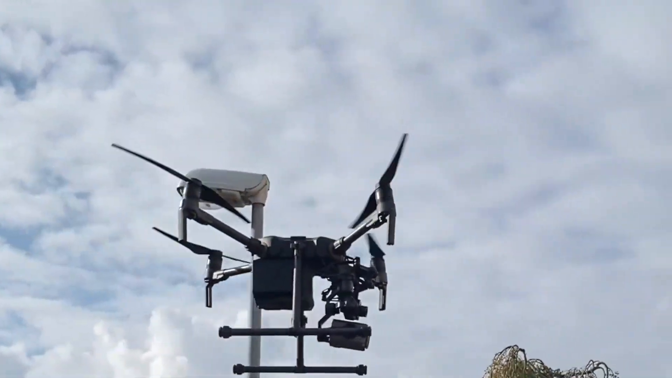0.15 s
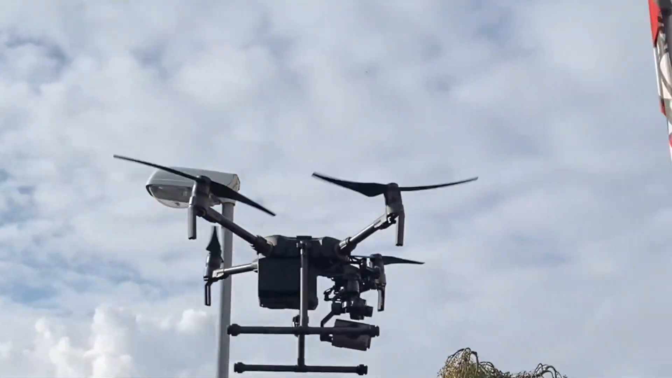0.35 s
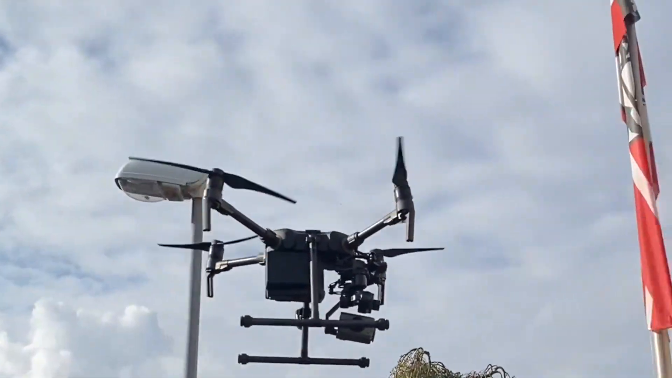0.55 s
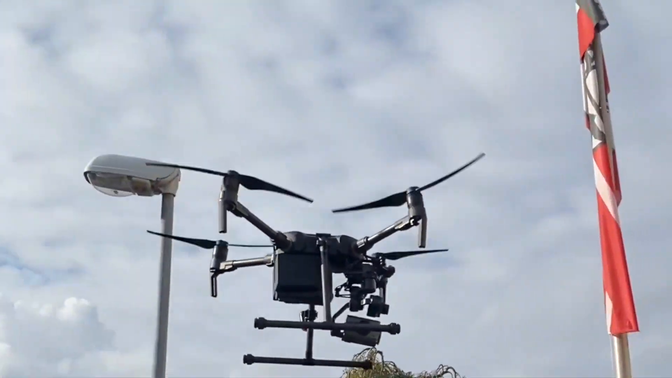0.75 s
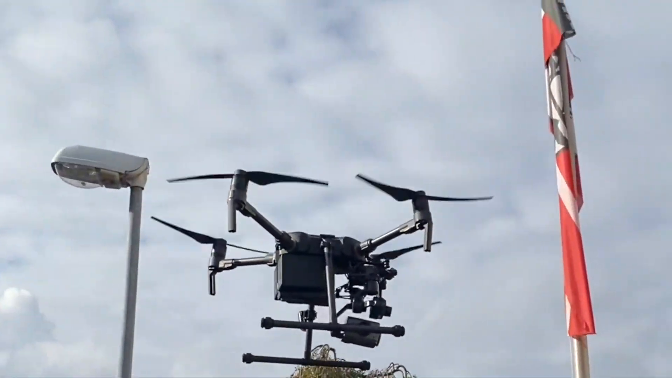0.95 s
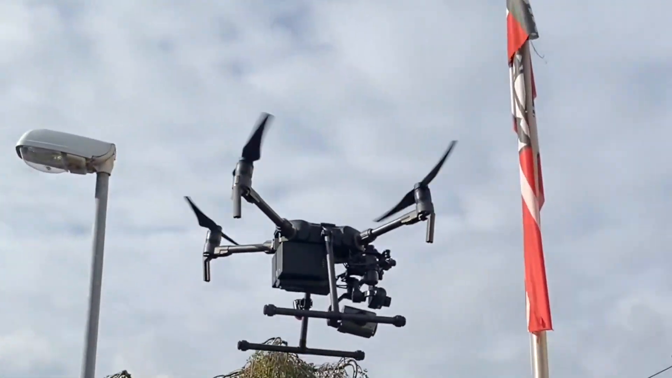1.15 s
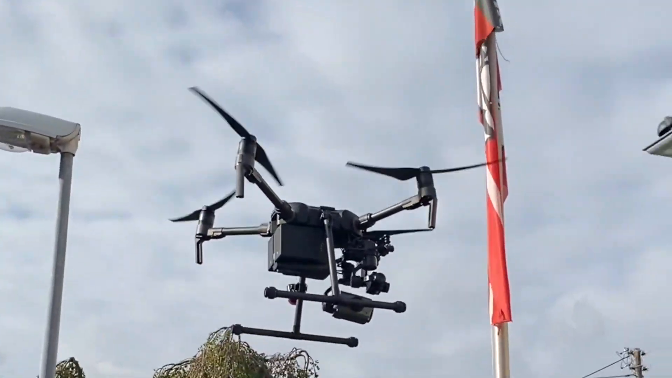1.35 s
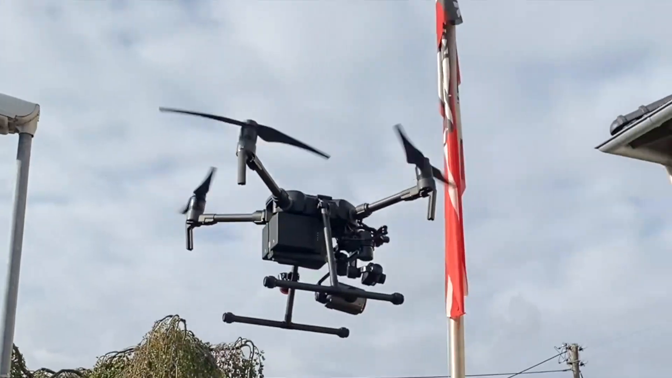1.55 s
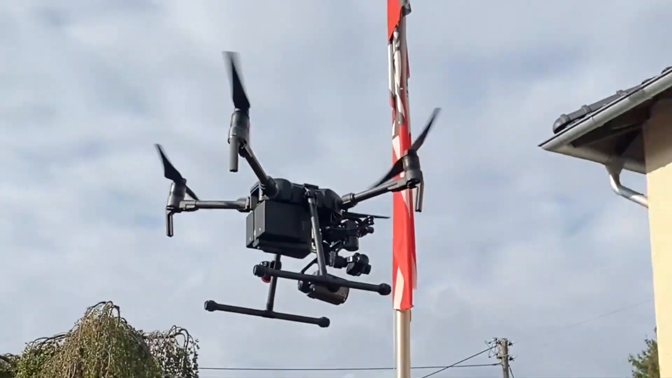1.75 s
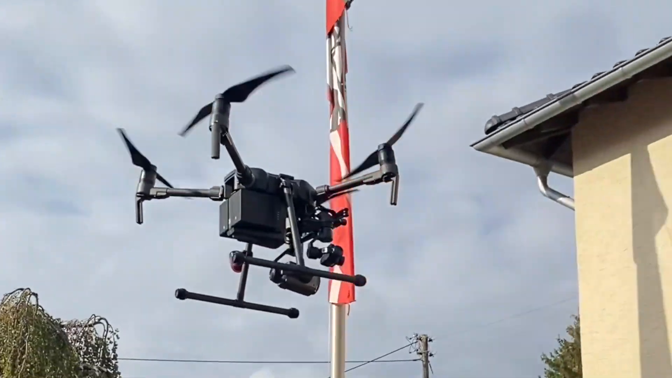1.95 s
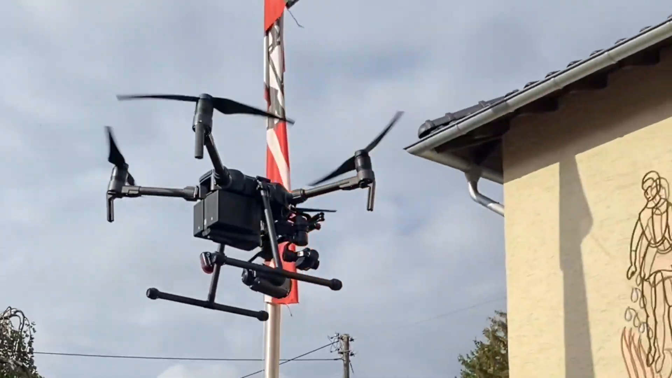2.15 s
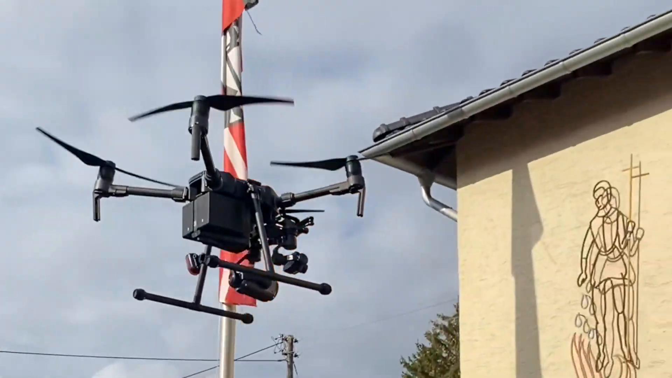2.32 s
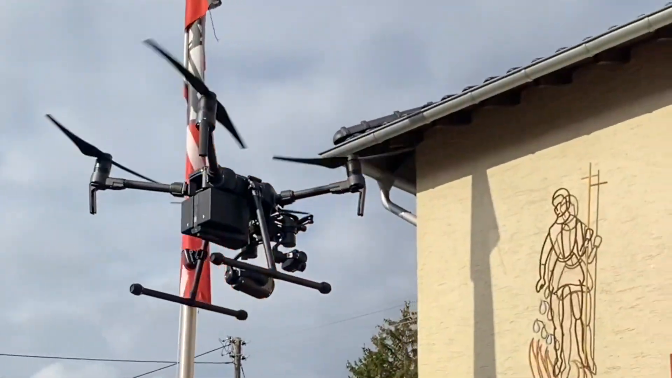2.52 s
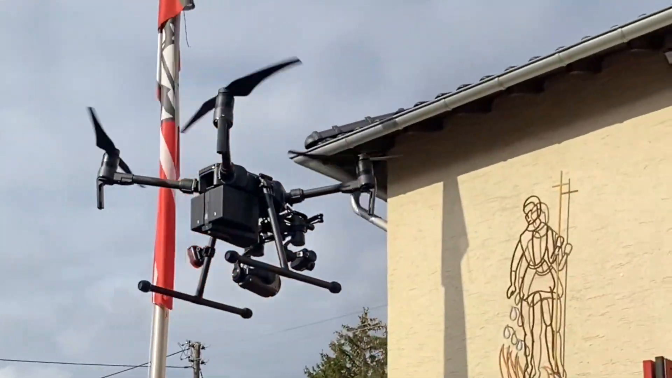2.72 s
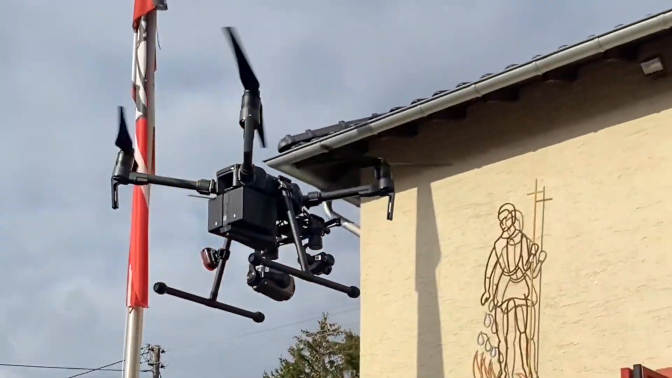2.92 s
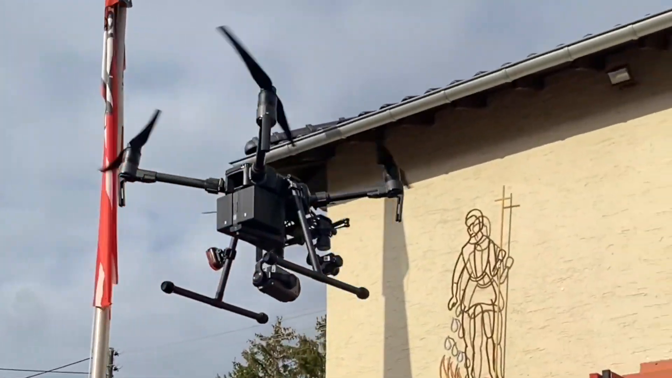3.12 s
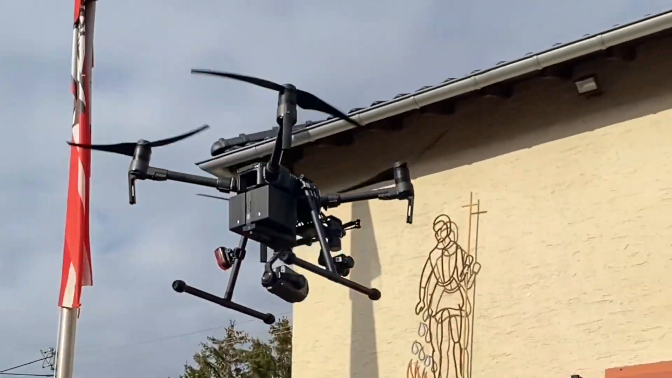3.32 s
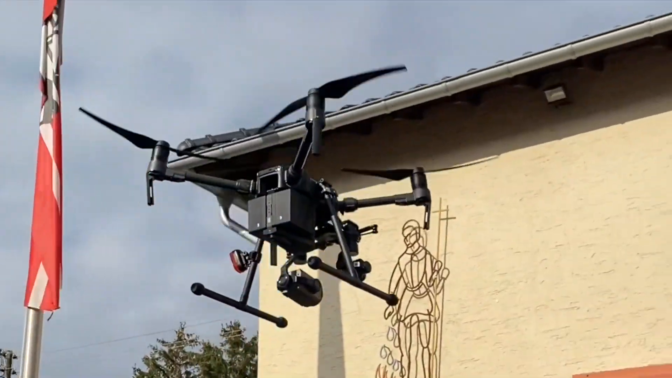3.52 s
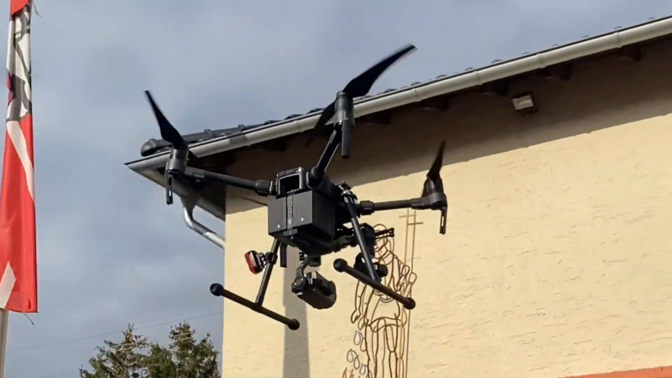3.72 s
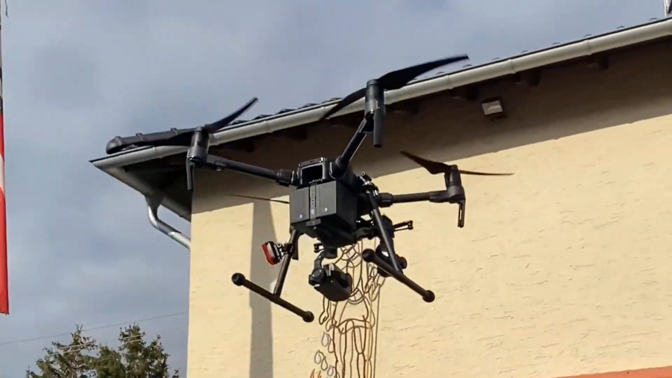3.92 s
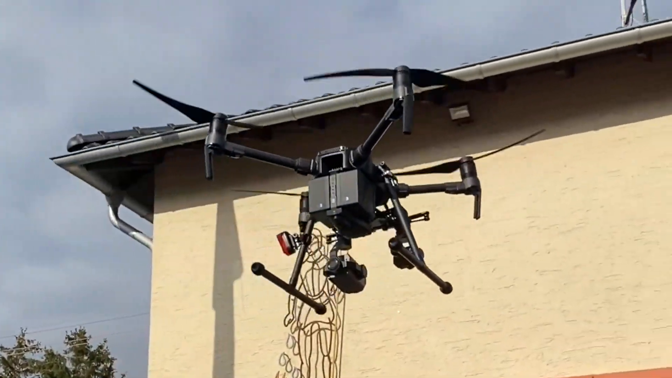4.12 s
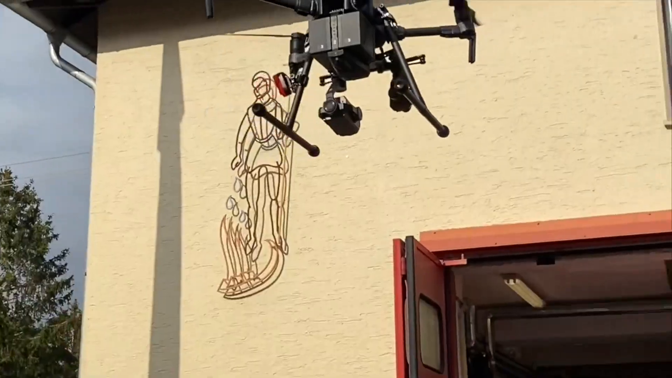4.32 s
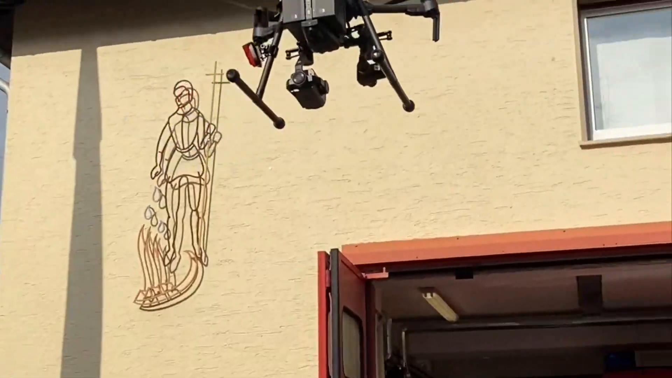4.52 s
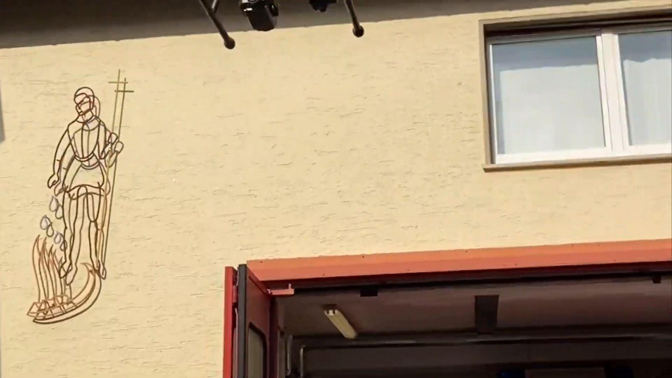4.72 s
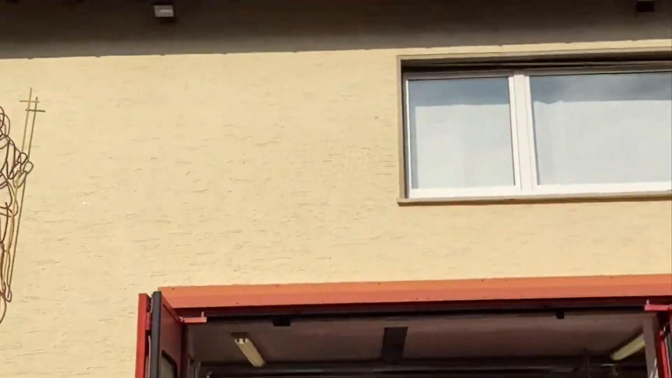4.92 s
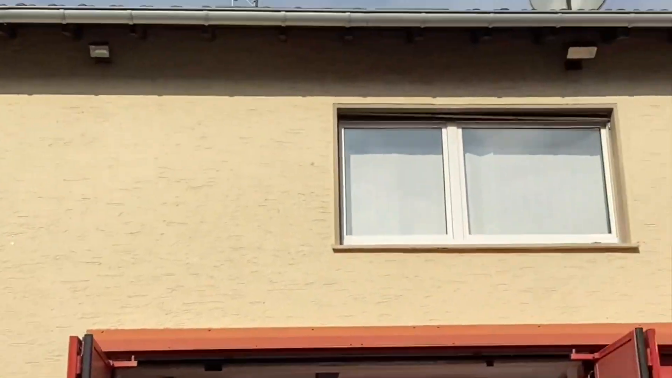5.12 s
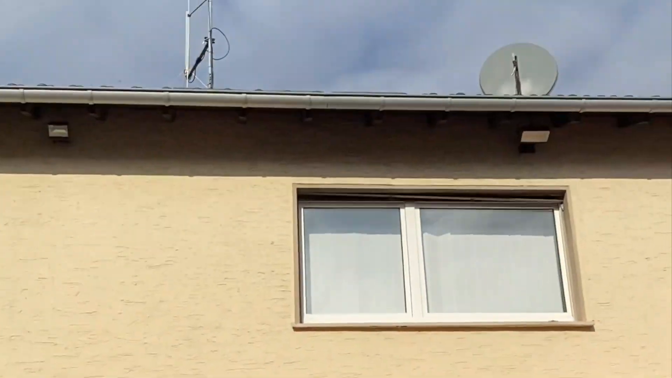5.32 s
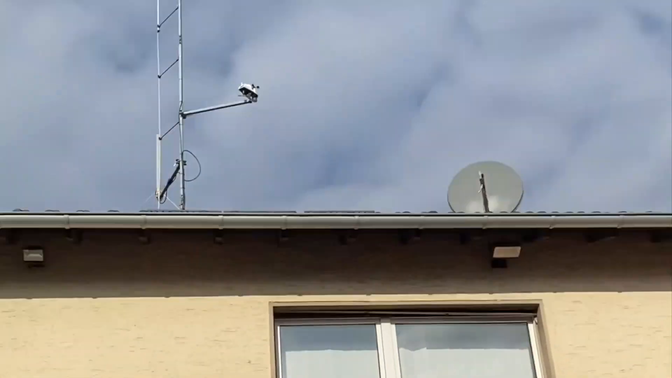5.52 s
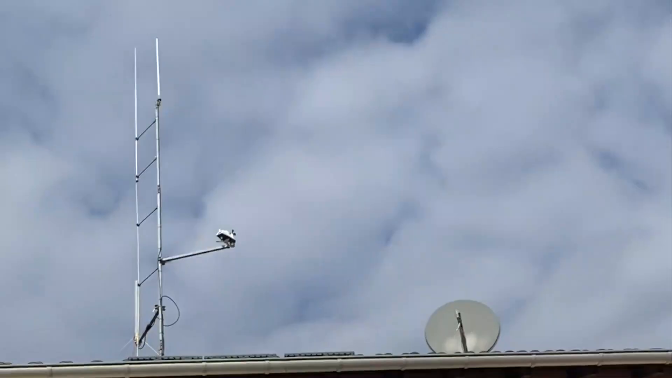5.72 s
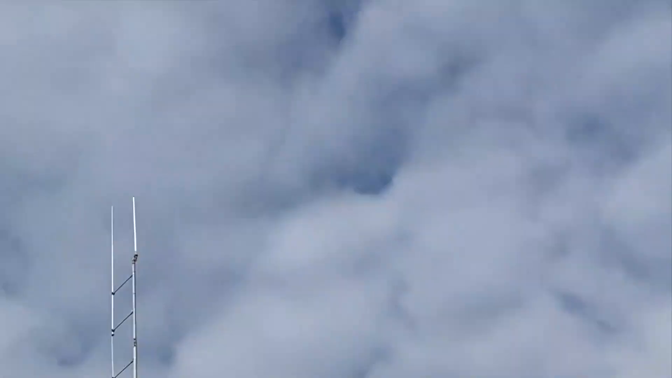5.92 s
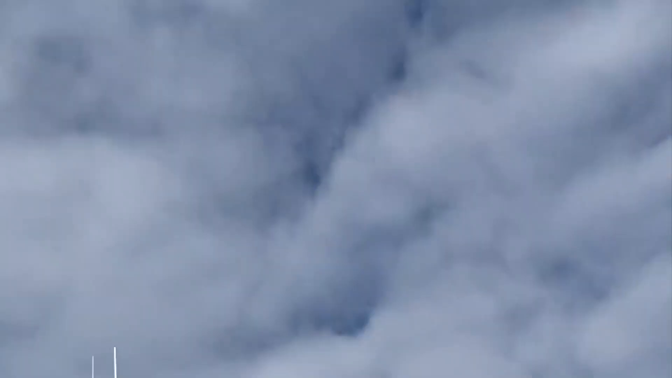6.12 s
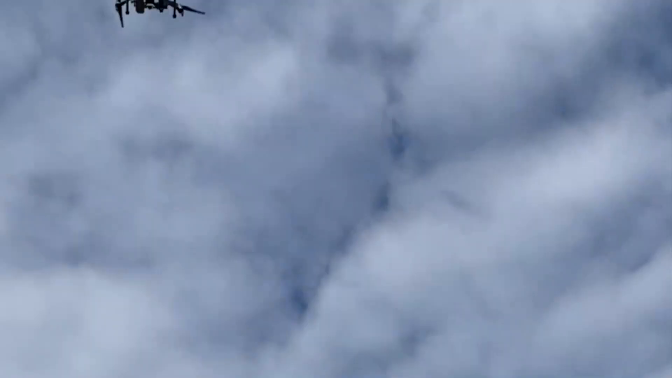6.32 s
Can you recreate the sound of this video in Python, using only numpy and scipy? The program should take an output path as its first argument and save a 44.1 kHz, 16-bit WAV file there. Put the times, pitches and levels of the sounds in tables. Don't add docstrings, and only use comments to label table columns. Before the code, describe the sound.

Outdoors near a building, a large four-rotor drone hovers close to a hand-held stereo microphone: a low, beating hum under a bright raspy buzz and chopped air hiss. After about four seconds it dips for an instant, surges higher and louder, then suddenly dulls behind the roof and recedes. Wind thumps and faint grip knocks accompany it.

```python
import sys
import numpy as np
from scipy import signal
from scipy.io import wavfile
from scipy.ndimage import uniform_filter1d

SR = 44100
rng = np.random.default_rng(int(sys.argv[2]) if len(sys.argv) > 2 else 0)


def nominal_scale(level):
    x = np.asarray(level, float) / 20
    return 10 ** x


def unload_wav(signal):
    wavfile.write(
        sys.argv[1],
        SR,
        np.round(np.clip(np.atleast_2d(signal).T, -1, 1) * 32767).astype(np.int16),
    )


N = 280476
T = np.arange(N) / SR
TREBLE_HZ = 5600

# pitch_hz, level_db
AIR_COLOUR = [(60, -23), (300, -15.5), (800, -5), (1200, -17), (1600, -35), (2150, -13), (3200, -17),
              (5000, -12.5), (8500, -21.5), (15800, -17.5)]
# centre_s, level_db, half_length_s
GUSTS = [(.08, -63, .04), (.22, -56, .03), (.5, -58, .05), (1.45, -63, .06), (6.207, -52, 0.025),
         (5.27, -46, 0.028), (1.75, -53, .08), (.9, -52, .08), (6.31, -51, .025), (0.778, -48, .03),
         (0.922, -42, 0.03), (2.322, -42, 0.056), (2.551, -50.5, .04), (2.672, -37, 0.042),
         (2.803, -44, 0.036), (3.187, -38, 0.05), (3.338, -24.5, 0.051), (3.63, -46, 0.056),
         (3.989, -43, 0.06), (4.423, -41, 0.063), (4.645, -35.5, 0.043), (4.996, -35.5, 0.045),
         (5.067, -43, 0.023), (5.184, -44, 0.028), (5.347, -38, 0.029), (5.65, -67, .03),
         (5.848, -22.5, 0.019), (5.93, -35.5, 0.018), (6.253, -36.5, 0.027)]
# pitch_hz, level_db
GUST_COLOUR = [(22, -52), (32, -26), (42, -8), (65, 4), (110, -2.5), (200, -14), (400, -62), (800, -57)]
# centre_s, level_db, ring_hz, half_length_s
KNOCKS = [
    (.8, -46, 335, .03),
    (0.974, -32, 603, 0.013),
    (1.041, -33, 754, .012),
    (1.084, -39, 595, 0.034),
    (1.978, -48, 331, 0.029),
    (3.59, -36, 610, .03),
]
# pitch_hz, likeness_0_to_1, left_minus_right_db
MICROPHONES = [(169, 1, -1), (330, 1, 0.5), (513, 0.8, 1), (1070, 0.76, 7.5), (1440, 0.68, 3.5),
               (1900, 1, -1.5), (2080, 0.58, -3.5), (2520, 0.56, -4.5), (3730, 0.25, -12), (3930, 0.63, -7),
               (5730, 1, 2.5), (7240, 0.7, -6)]
# pitch_hz, lead_radians
LEFT_LEAD = [(170, 0), (860, .35), (1400, -.7), (2050, -.4), (2420, .8), (3300, -.6), (4700, .85),
             (5600, .9), (7500, 3.14), (10400, 6.28), (12550, 8.65), (14700, 10.2), (15300, 11.7),
             (15900, 12.4)]
# time_s, pitch_hz, depth_db
ECHO_DIP = [(4.7, 2900, 0.8), (4.95, 3050, -4.5), (5.15, 3000, -8), (5.28, 3020, -8), (5.4, 2950, -6),
            (5.52, 2830, -11), (5.8, 3100, -5), (6.1, 3500, -5), (6.2, 4300, -9), (6.36, 3700, -7)]
# time_s, pitch_hz, lift_db
ECHO_GLOW = [(0, 3150, 5), (.15, 3300, 0.5), (.25, 3800, 2), (.45, 4400, 1.5), (.9, 4500, 1),
             (1.2, 4000, -2.3), (2.4, 3000, 3.3), (2.7, 3020, 1.5), (3.0, 3000, 1.3), (4.1, 2300, -1.5),
             (4.35, 2200, 2.2), (4.6, 3000, 0.5), (4.8, 4040, 1.5), (4.95, 4000, 6), (5.15, 3600, 7.5),
             (5.28, 3600, 8.5), (5.36, 3600, 2), (6.36, 3600, -5)]
# time_s, level_db, treble_tilt_db
HISS = [(0.0, -40, 6.5), (0.03, -29, 1), (0.21, -32, 0.5), (0.65, -29.5, 0), (1.2, -30, 0.5),
        (2.46, -29, 0.5), (2.87, -31, 0), (4.18, -30, 0), (4.39, -24.5, 0.5), (4.6, -23, 0),
        (5.1, -31.5, 0.5), (5.26, -32.5, -0.5), (5.33, -45.5, 2.5), (5.56, -48, 3.5), (6.36, -50, 2.5)]
# pitch_hz, level_db
HISS_COLOUR = [(100, -12), (250, -5.5), (500, -4.5), (1000, 1.5), (2000, 2), (3000, 3.5), (3800, -2),
               (4500, 1), (6000, -3.5), (8000, -2), (10500, -7), (13000, -6), (15900, -14.5)]
# time_s, level_db
HISS_THINNING = [
    (0, -4),
    (4.2, -4),
    (4.4, -5),
    (4.9, -7),
    (5.25, -8),
    (5.4, 0),
]
# time_s, speed_share_of_hover
THROTTLE = [(4.19, 1.0), (4.25, 1.071), (4.33, 1.154), (4.42, 1.172), (4.63, 1.209), (4.85, 1.226),
            (5.07, 1.244), (5.18, 1.241), (5.29, 1.22), (5.4, 1.184), (5.66, 1.124), (5.82, 1.094),
            (6.36, 1.068)]
# time_s, then rotor_1_hz to rotor_4_hz
TRIM = [(0.0, 124.9, 131.4, 140.2, 142.8), (0.15, 125.3, 131.5, 140.8, 142.5),
        (0.3, 125.1, 131.0, 141.2, 141.7), (0.45, 125.0, 130.8, 140.4, 141.3),
        (0.6, 124.9, 130.3, 139.7, 141.5), (0.75, 125.1, 130.5, 140.3, 141.1),
        (0.9, 126.2, 130.8, 140.8, 141.4), (1.05, 126.9, 131.0, 142.5, 141.9),
        (1.2, 126.2, 131.3, 142.5, 141.9), (1.35, 125.6, 130.6, 142.2, 141.6),
        (1.5, 127.1, 128.5, 141.5, 140.9), (1.65, 128.0, 128.4, 141.3, 140.9),
        (1.8, 128.4, 129.2, 141.2, 139.6), (1.95, 128.5, 128.9, 142.0, 139.0),
        (2.1, 127.6, 129.5, 143.6, 139.6), (2.25, 126.4, 129.9, 144.1, 139.5),
        (2.4, 127.7, 130.4, 143.9, 140.0), (2.55, 128.3, 130.4, 142.9, 139.8),
        (2.7, 127.6, 130.6, 142.4, 140.4), (2.85, 125.7, 130.3, 141.3, 140.5),
        (3.0, 125.1, 130.5, 141.6, 141.0), (3.15, 126.0, 130.5, 142.3, 141.1),
        (3.3, 126.5, 131.0, 143.0, 141.1), (3.45, 126.7, 130.9, 142.7, 141.4),
        (3.6, 125.4, 131.1, 141.5, 141.9), (3.75, 124.5, 131.8, 141.2, 143.1),
        (3.9, 124.3, 131.8, 140.9, 143.9), (4.05, 123.5, 131.6, 140.2, 142.8),
        (4.2, 124.2, 131.8, 140.1, 142.8), (4.35, 124.5, 131.7, 140.2, 142.3),
        (4.5, 125.1, 131.4, 140.4, 142.2), (4.65, 125.0, 130.9, 140.3, 141.9),
        (4.8, 125.7, 130.3, 140.0, 141.8), (4.95, 126.1, 130.3, 139.8, 140.8),
        (5.1, 126.1, 130.8, 140.2, 140.7), (5.25, 127.3, 131.2, 140.9, 140.1),
        (5.4, 127.2, 132.9, 140.8, 140.2), (5.7, 125.0, 132.3, 141.1, 140.4),
        (6.0, 124.0, 131.9, 140.1, 139.4), (6.36, 124.1, 131.3, 139.8, 139.1)]
HUM_START = [.1, .3, .6, .8]
# time_s, then rotor_1_db to rotor_4_db
LIFT = [(0.0, -51, -30, -30, -26), (0.25, -42, -34.5, -37, -36), (0.45, -50, -35, -44, -34),
        (0.75, -60, -35, -47, -26), (1.1, -39, -34, -36, -29.5), (1.5, -39, -69, -38, -28.5),
        (1.75, -36, -41, -37, -28.5), (2.0, -37, -50, -29, -35), (2.35, -36.5, -51, -31.5, -37),
        (2.7, -34, -48, -31, -41), (2.85, -33.5, -43, -34, -37), (3.0, -35, -36, -43, -36.5),
        (3.25, -31, -45, -34, -33.5), (3.6, -34.5, -35, -29.5, -37), (4.0, -31, -33, -38, -33),
        (4.19, -39, -45, -38, -32), (4.3, -27.5, -39, -27, -29), (4.6, -30, -29.5, -30, -36),
        (5.0, -69, -36, -50, -27), (5.2, -42, -32.5, -31, -44), (5.4, -27, -29, -27.5, -68),
        (5.62, -32, -31, -31, -69), (5.8, -37, -32, -24, -69), (6.0, -42, -35, -33, -56),
        (6.36, -47, -46, -33, -64)]
# time_s, then rotor_1_db to rotor_4_db
SLAP = [(0.0, -27, -39, -44, -32.5), (0.1, -42, -37, -36, -28), (0.2, -42, -38, -36, -32.5),
        (0.3, -38, -38.5, -35, -33), (0.4, -31, -37, -30, -35), (0.52, -31, -37, -43, -31.5),
        (0.6, -37.5, -44, -44, -31.5), (0.7, -34, -41, -39, -30.5), (0.8, -30.5, -42, -28.5, -32.5),
        (1.0, -34.5, -32.5, -28.5, -33), (1.2, -30, -58, -29, -37.5), (1.4, -35.5, -32.5, -51, -31.5),
        (1.6, -29.5, -44, -47.5, -28), (1.8, -32.5, -31, -35, -29.5), (2.0, -31, -42, -41, -28.5),
        (2.2, -29, -42, -52, -30.5), (2.4, -32.5, -47, -38, -29.5), (2.6, -30.5, -63, -32.5, -30.5),
        (2.8, -30, -37, -35.5, -31), (3.0, -27.5, -32, -29, -34), (3.2, -27.5, -35, -32, -40.5),
        (3.4, -34, -37, -36, -30), (3.6, -30.5, -33, -33, -32), (3.8, -30, -41, -33, -33.5),
        (4.0, -31, -37, -38, -34), (4.19, -32.5, -30.5, -41, -30.5), (4.3, -33.5, -31, -27.5, -30),
        (4.4, -29.5, -27.5, -24.5, -39), (4.5, -25.5, -31, -34, -39), (4.6, -23, -28, -20, -37),
        (4.7, -27.5, -28, -23.5, -40), (4.8, -29.5, -29, -28, -31.5), (4.9, -29, -31, -34, -36),
        (5.0, -40, -45, -31.5, -33), (5.1, -35.5, -31.5, -32, -36.5), (5.2, -73, -32, -30, -34),
        (5.3, -65, -35, -28, -39), (5.4, -70, -38.0, -35, -44), (5.85, -60, -35, -37, -32),
        (6.36, -60, -31, -30, -44)]
THROB_DB = [-38, -37.5, -42, -31.5]
DRONE_DB = [-39, -38, -37, -33.5]
SHADE_DB = [-16, -13.5, -15.5, -26.5]
BEHIND_DB = [1, -1, -1, 1.5]
# multiple_of_blade_passes, level_db
STACK = [(2, -5.5), (3, -2.5), (4, -7), (7, -10), (8, -11), (12, -11.5), (20, -13.5), (30, -15),
         (40, -20.5), (50, -26.5), (64, -28.5), (90, -40)]
# pitch_hz, smear_radians
SMEAR = [(1500, 1.3), (3000, .45)]
# time_s, even_multiples_db, over_25_db, near_16_db
VIEW = [(0, -2, 3.5, 1.5), (.12, -1.5, 2, 2), (.25, -3, -3.5, 2.5), (.45, -4, 3.5, -3.5), (.6, -2, 8, 0),
        (.85, -2.5, 3, -5.5), (1.1, -0.5, 1, -3.5), (1.3, 0, 6, 1.5), (1.5, -0.5, 4, 0),
        (1.75, 0, 1.5, 0.5), (2.0, 0, 3, 3), (2.25, 0, 2.3, 2), (2.5, 1, 3, 2.5), (2.75, 0, -0.5, 2),
        (3.0, 1.5, -2, -6), (3.3, 2, 0.5, 0.5), (3.6, 1, -2.5, -3), (3.9, 1, -0.5, -0.5),
        (4.15, 2, -1.5, -3), (4.3, 6.5, -1.5, -3.5), (4.5, 3.5, 1, 1.5), (4.65, 3.5, -0.5, -3.5),
        (4.8, 2, 3, 4), (5.0, -0.5, 5, 8.5), (5.15, 3, 3, 7.5), (5.5, 1.5, 7.5, -1), (5.9, 4, 10, 8),
        (6.36, 4.5, -9, 1)]
FROM_FRONT = [(1.5, -1, -13, -4.5, 1.5, 8.2), (1.5, -12.5, 0, -15, 4, 3.5), (1.5, -13, 5.5, 1, 2, 2.1),
              (2.5, -0.5, 0.5, 2.5, 0.5, 4.5)]
SIDE_ON = [(1.5, 2.6, -11, 2.5, 4.5, 6.4), (1.5, -7, 3.5, 2.5, -2, .4), (1.5, 2.2, 6, -1.5, -5, 0.97),
           (1.5, 0.3, -3.5, 1.5, -4, 2.4)]
BY_WALL = [(1.5, 1.7, -10, 6, -3, 4.8), (1.5, -6, 1, -2, 4, .4), (1.5, 0, -1.5, -2, -9, 1.1),
           (1.5, 3.1, -3.5, 2, -10, 3.1)]
TILTED = [(1.3, 8, 3, 0.2, 5, 3), (1.5, 5, 2.5, 0.2, -4, .4), (1.5, -1, -3, -1.5, -7, -3),
          (-1.5, 2, -7, 0.2, -4, 7)]
FROM_BELOW = [(0, -7, 1.5, -6, 0, -5), (5, -9, 2, 4, 0.5, -2), (2, 8, -22, 0, -4, -4),
              (-12, -3, -4, 5, -4, -1)]
OVERHEAD = [(0.2, -5, 8, -3, 0.2, 1.2), (-5, -6, 7.5, -1, 3, 3), (3, 12, -14, 1, -2, -1),
            (-14, 0.5, -3, -3, -9.5, -1)]
FROM_BEHIND = [(-3, -4, -5, -6, -3, 0.2), (1, -7, 1, 3, -7, 0.2), (3, 3, -10, 3, -5, 0),
               (1.5, -1.5, 0.5, -6, -9, 0)]
FROM_AFAR = [(1.5, -9, -7, -3, -6, -5), (1.5, -3, -3, -8, -9, 3), (2.5, -8, 7, 2, 2, -2),
             (3, -0.5, 5.5, 4, -5, 1)]
VIEW_TIMES = [
    .3,
    1.9,
    3.1,
    4.15,
    4.35,
    4.62,
    4.9,
    5.17,
    5.54,
]
WIDER_TREBLE_TIMES = [
    .635,
    1.75,
    4.2,
    5.745,
]


def evened(x):
    return x / np.sqrt(np.mean(abs(x) ** 2) + 1e-20)


def smooth(x, width):
    return uniform_filter1d(uniform_filter1d(x, width), width)


def at_pitch(table, hz, order=1):
    columns = np.transpose(table)
    return np.interp(np.log(hz + 1e-3), np.log(columns[0]), columns[order])[:, None]


def at_time(table, order, t):
    columns = np.transpose(table)
    return np.interp(t, columns[0], columns[order + 1])


def frames(x):
    return signal.stft(x, SR, nperseg=2048, noverlap=1536)


def sound(z):
    return signal.istft(z, SR, nperseg=2048, noverlap=1536)[1][..., :N]


def patches(shape, bins, steps):
    x = rng.standard_normal(shape[::-1]).T
    for _ in range(2):
        x = uniform_filter1d(x, bins, 0)
        x = uniform_filter1d(x, steps, 1)
    return evened(x)


def microphones(hz, z, other):
    treble = hz[:, None] > TREBLE_HZ
    like = np.where(treble, .87, np.clip(at_pitch(MICROPHONES, hz), 0, 1))
    balance_db = at_pitch(MICROPHONES, hz, order=2) * (hz[:, None] < TREBLE_HZ)
    lean = nominal_scale(balance_db / 2)
    lead = np.exp(.5j * at_pitch(LEFT_LEAD, hz))
    share = np.arccos(like) / 2
    a, b = np.cos(share) * z, np.sin(share) * other
    return np.array([(a + b) * lead * lean, (a - b) / lead / lean])


def moving_band(table, hz, t, width_hz):
    distance = (hz[:, None] - at_time(table, 0, t)) / width_hz
    return nominal_scale(at_time(table, 1, t) * np.exp(-.5 * distance ** 2))


def echo_dip(hz, t):
    return moving_band(ECHO_DIP, hz, t, width_hz=240)


def echo_glow(hz, t):
    return moving_band(ECHO_GLOW, hz, t, width_hz=380)


def air():
    hz, t, z = frames(rng.standard_normal((2, N)))
    z = z * nominal_scale(at_pitch(AIR_COLOUR, hz)) * echo_dip(hz, t)
    return nominal_scale(-40) * evened(sound(microphones(hz, *z)))


def wind(apart=0.083, lumpy_db=16.0):
    hz, t, z = frames(rng.standard_normal((2, N)))
    a, b = evened(sound(z * nominal_scale(at_pitch(GUST_COLOUR, hz))))
    a = a / np.sqrt(uniform_filter1d(a ** 2, 3000) + 0.046)
    lumps = evened(smooth(rng.standard_normal(N), 2500)).clip(-2, .4)
    level = nominal_scale(-55 + lumpy_db * lumps)
    for centre_s, level_db, half_s in GUSTS:
        level = level + nominal_scale(level_db) * np.exp(-.5 * ((T - centre_s) / half_s) ** 2)
    return level * np.array([a + apart * b, a - apart * b])


def knocks():
    total = np.zeros(N)
    for centre_s, level_db, ring_hz, half_s in KNOCKS:
        swell = np.exp(-.5 * ((T - centre_s) / half_s) ** 2)
        total += nominal_scale(level_db) * np.sqrt(2) * swell * np.sin(2 * np.pi * ring_hz * T)
    return total


def hiss(gate, patchy_db=2.0, flutter_db=1.23):
    gate = np.sqrt(gate / uniform_filter1d(gate, 6000))
    gate = gate * nominal_scale(flutter_db * evened(uniform_filter1d(rng.standard_normal(N), 120)))
    hz, t, z = frames(gate * rng.standard_normal((2, N)))
    tilt_db = np.log2(np.maximum(hz, 200) / 3500)[:, None] * at_time(HISS, 1, t)
    thinned = at_pitch([(600, 0), (1100, 1), (4800, 1), (6500, 0)], hz)
    level_db = at_time(HISS, 0, t) + 7.5 + tilt_db + thinned * at_time(HISS_THINNING, 0, t)
    patch_db = patchy_db * patches(z[0].shape, 16, 5)
    z = z * nominal_scale(at_pitch(HISS_COLOUR, hz) + level_db + patch_db)
    return microphones(hz, *(z * echo_dip(hz, t) * echo_glow(hz, t)))


def speed(order, t):
    return at_time(TRIM, order, t) * at_time(THROTTLE, 0, t)


def layers(order, t):
    lift, slap = at_time(LIFT, order, t), at_time(SLAP, order, t)
    lift_change, slap_change = lift - lift.mean(), slap - slap.mean()
    extra = at_time(THROTTLE, 0, t) - 1
    throb = THROB_DB[order] + 0.15 * lift_change + 0.077 * slap_change + 20.7 * extra
    drone = DRONE_DB[order] + 0.15 * lift_change + 0.4 * slap_change + 14 * extra
    roof_s, width_s = 5.295, 0.08
    shade = .5 + .5 * np.tanh((t - roof_s) / (2 * width_s))
    away_db = -1 * np.maximum(t - roof_s, 0)
    return [level_db + (deep_db + BEHIND_DB[order]) * shade + away_db
            for level_db, deep_db in zip((lift, throb, drone, slap), SHADE_DB)]


def accents(order, multiple, t):
    views = [FROM_FRONT, SIDE_ON, BY_WALL, SIDE_ON, TILTED, FROM_BELOW, OVERHEAD, FROM_BEHIND, FROM_AFAR]
    total_db = 0
    for k, view_db in enumerate(np.transpose([view[order] for view in views])):
        near = np.clip(1 - abs(np.maximum(multiple, 2) - (k + 2)), 0, 1)
        total_db = total_db + np.interp(t, VIEW_TIMES, view_db) * near
    return total_db


def stack_level(order, hz, t, multiple):
    _, throb, drone, buzz = layers(order, t)
    level_db = throb + (drone - throb) * np.clip(multiple - 3, 0, 1)
    level_db = level_db + (buzz - drone) * np.clip(multiple - 7, 0, 1)
    number, shape_db = np.transpose(STACK)
    level_db = level_db + np.interp(np.log(multiple + 1e-3), np.log(number), shape_db)
    even_db = np.cos(np.pi * multiple) * (multiple < 6.5) * at_time(VIEW, 0, t)
    high_db = np.clip((multiple - 20) / 8, 0, 1) * at_time(VIEW, 1, t)
    middle_db = np.exp(-((multiple - 16) / 5) ** 2) * at_time(VIEW, 2, t)
    housing_db = -4.5 * np.exp(-.5 * ((hz[:, None] - 3650) / 300) ** 2)
    return level_db + accents(order, multiple, t) + even_db + high_db + middle_db + housing_db


def blades(turns, count=85):
    half = np.pi * turns
    return np.sin((2 * count + 1) * half) / (2 * np.sin(half) + 1e-12) - .5


def rotor(order, chop=0.043, steady=0.72, puff_db=2.5):
    turns = HUM_START[order] + np.cumsum(speed(order, T)) / SR
    hum_db, _, _, buzz_db = layers(order, T)
    hum = np.sqrt(2) * nominal_scale(hum_db) * np.cos(2 * np.pi * turns)
    inflow = smooth(rng.standard_normal(N), 500)
    late = .0008 * np.interp(T, (4.3, 4.5), (.85, .7)) * evened(inflow)
    late = late + .002 * evened(smooth(inflow, 2500))
    uneven = 1 + .025 * np.cos(np.pi * turns)
    hz, t, z = frames(-np.sqrt(2) * uneven * blades(turns + late + 1e-7))
    multiple = hz[:, None] / speed(order, t)
    z = z * nominal_scale(stack_level(order, hz, t, multiple)) * echo_dip(hz, t) * echo_glow(hz, t)
    z = z * np.clip(3 * (multiple - 1.4), 0, 1)
    depth_db = 2.6 * np.clip(multiple / 12, .55, 1)
    paths = []
    for _ in range(2):
        fade = nominal_scale(depth_db * patches(z.shape, 8, 13))
        paths.append(fade * np.exp(1j * at_pitch(SMEAR, hz) * patches(z.shape, 14, 70)))
    flicker_db = np.interp(t, (5.2, 5.5), (.8, 2.8))
    z = z * nominal_scale(flicker_db * patches(z.shape, 3, 4))
    puff = nominal_scale(puff_db * rng.standard_normal(1200))[np.round(turns).astype(int)]
    sweep = np.exp((np.cos(2 * np.pi * (turns + late)) - 1) / chop)
    gate = steady + puff * sweep * nominal_scale(0.61 * (buzz_db + 27.5).clip(-8, 8))
    return microphones(hz, z * paths[0], z * paths[1]), hum, gate ** 2


def scene():
    stacks, hum, gate = (sum(parts) for parts in zip(*[rotor(order=k) for k in range(4)]))
    hum = np.array([np.roll(hum, shift=2), hum])
    return air() + wind() + knocks() + hum + sound(stacks + hiss(gate))


def thin_treble(x, size=8, hop=1024, lead=656):
    window = signal.windows.kaiser_bessel_derived(2 * hop, 4 * np.pi)
    shape = dict(fs=SR, window=window, nperseg=2 * hop, noverlap=hop)
    pair = np.array([x[0] + x[1], x[0] - x[1]]) / 2
    hz, t, z = signal.stft(np.pad(pair, ((0, 0), (lead, 0))), **shape)
    power = (abs(z[:, :-1]).reshape(2, -1, size, len(t)) ** 2).mean(2)
    power = uniform_filter1d(uniform_filter1d(power, 3, 2), 3, 1)
    weak_db = -5.0 + 1.5 * patches(power[0].shape, 3, 1)
    full = abs(t[:, None] - lead / SR - WIDER_TREBLE_TIMES).min(1) < hop / SR / 2
    strong = power > nominal_scale(2 * weak_db) * power[::-1]
    keep = np.repeat(np.maximum(strong, .4 * full), size, axis=1)
    keep = np.maximum(keep, hz[:-1, None] < 6200)
    z[:, :-1] *= keep * (hz[:-1, None] < 15870)
    mid, side = signal.istft(z, **shape)[1][:, lead:lead + N]
    return np.array([mid + side, mid - side])


def band_limit(x):
    return signal.sosfilt(signal.butter(12, 17130, fs=SR, output="sos"), x)


def record(dry):
    dip = np.clip(abs(T - 4.192) / 0.009, .03, 1) ** 1.34
    mix = thin_treble(0.72 * np.tanh(dry * dip / 0.8))
    return band_limit(mix)


dry = scene()
out = record(dry)
unload_wav(out)
```